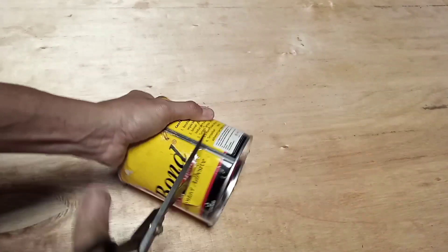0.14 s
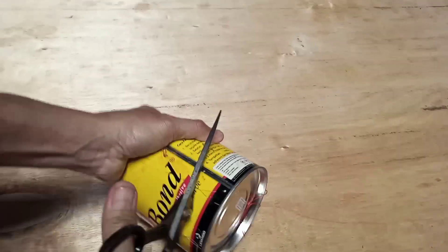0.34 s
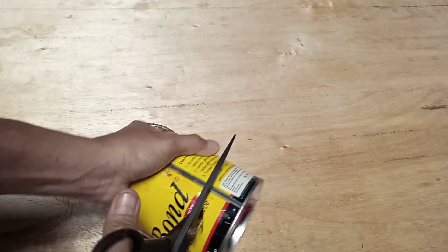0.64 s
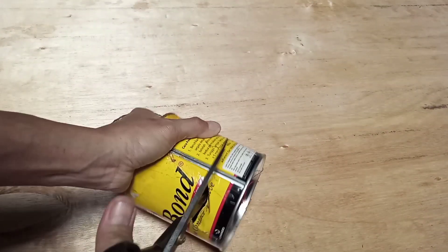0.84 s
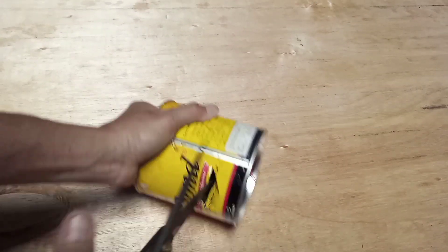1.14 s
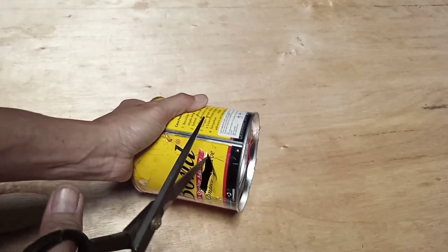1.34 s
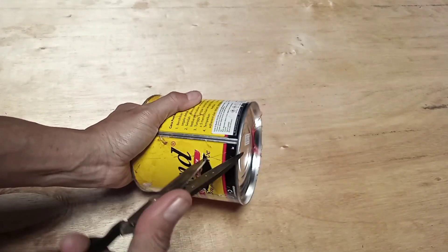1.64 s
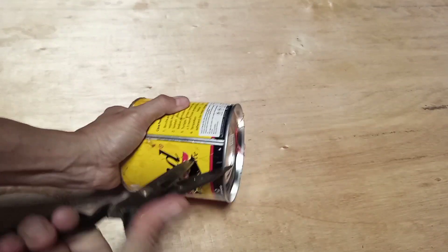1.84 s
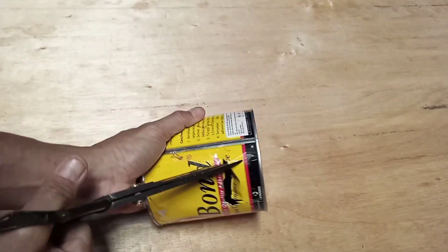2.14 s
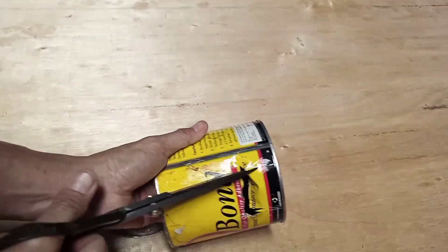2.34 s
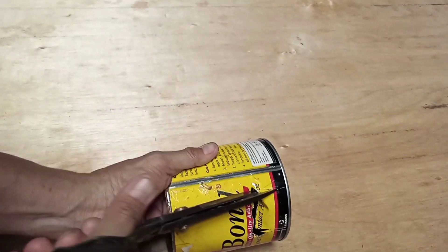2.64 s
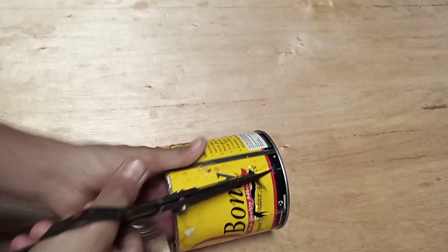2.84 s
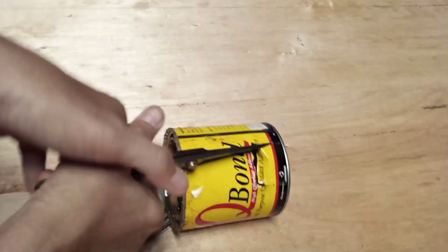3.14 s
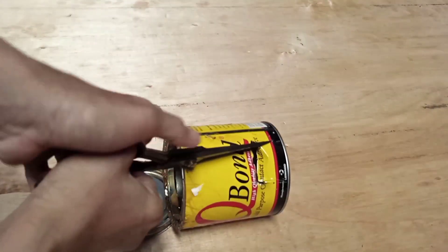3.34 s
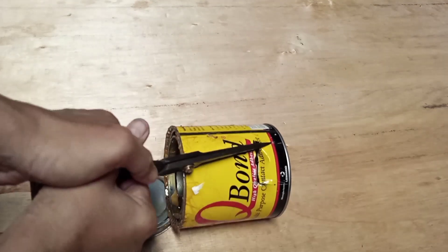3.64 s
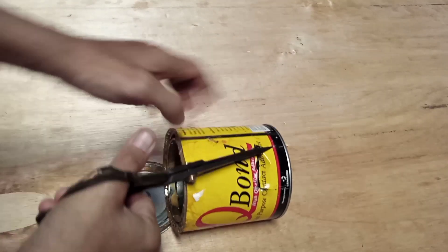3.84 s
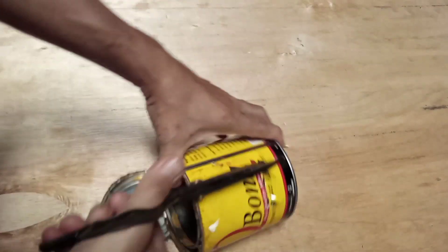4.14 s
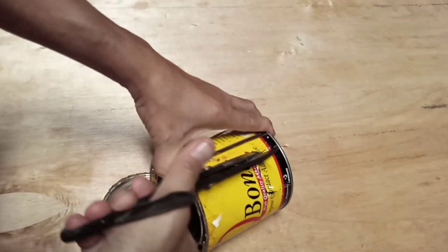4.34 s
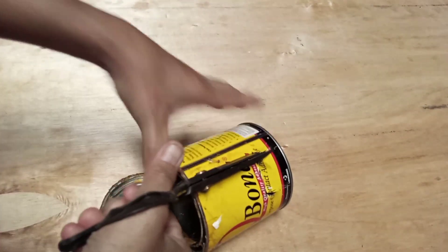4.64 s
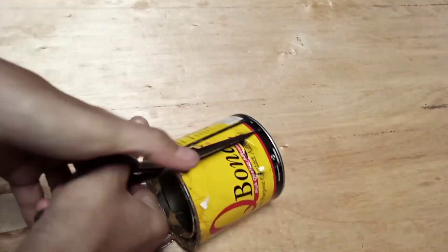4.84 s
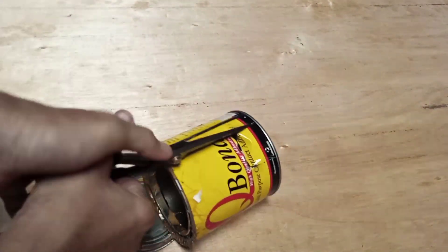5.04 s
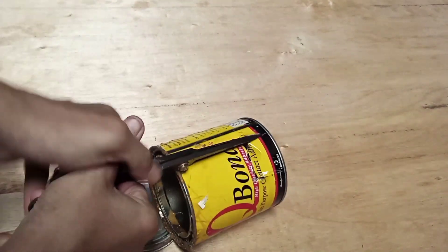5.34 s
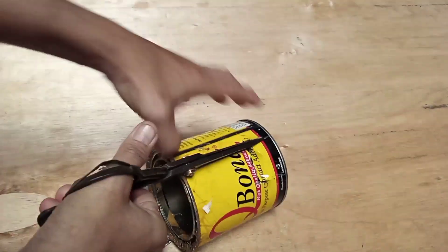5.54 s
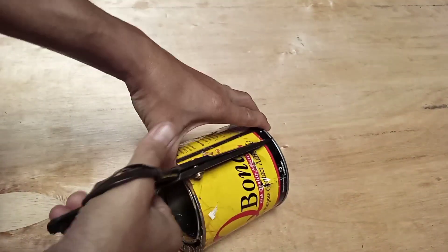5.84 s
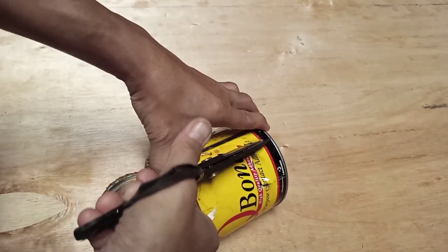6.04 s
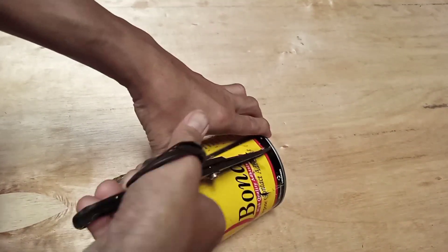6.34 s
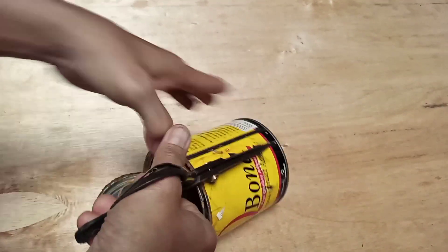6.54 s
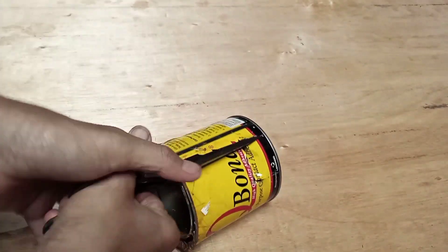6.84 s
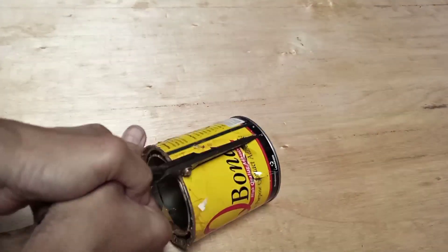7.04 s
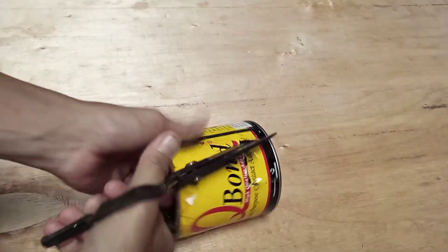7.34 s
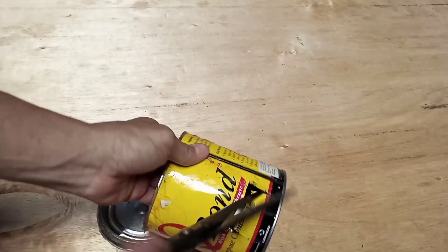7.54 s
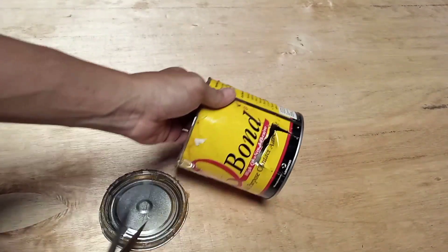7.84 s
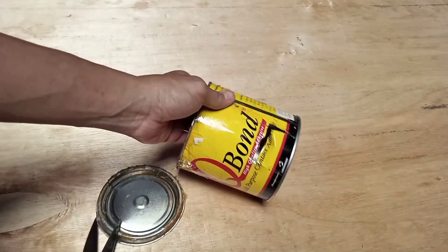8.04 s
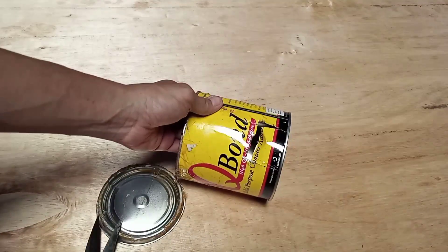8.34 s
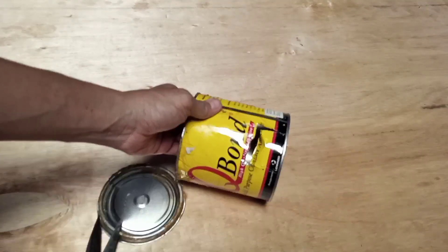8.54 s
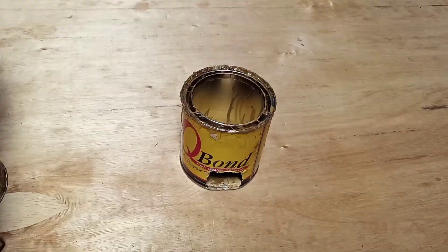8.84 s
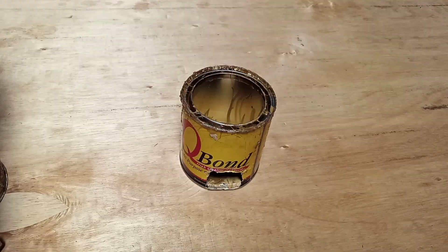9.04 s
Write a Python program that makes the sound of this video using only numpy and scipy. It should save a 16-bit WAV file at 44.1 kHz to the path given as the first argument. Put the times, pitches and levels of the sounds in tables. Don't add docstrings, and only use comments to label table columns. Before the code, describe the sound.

Hand shears work through an empty tin can held on a wooden table. A loud hollow clatter and snap come right at the start, then sparse ticks and scrapes, a dense burst of tearing near four seconds, more snaps and a final clack around eight. Close phone microphone, dull treble, very little room echo, almost silent background.

```python
import sys
import numpy as np
from scipy import signal
from scipy.io import wavfile
from scipy.ndimage import uniform_filter1d

SR = 44100
rng = np.random.default_rng(int(sys.argv[2]) if len(sys.argv) > 2 else 0)


def unload_wav(signal):
    wavfile.write(
        sys.argv[1],
        SR,
        np.round(np.clip(np.atleast_2d(signal).T, -1, 1) * 32767).astype(np.int16),
    )


def makeup_ratio(level_db):
    decades = np.asarray(level_db, float) / 20
    return 10 ** decades


N = 405717


def evened(x):
    return x / np.sqrt(np.mean(x ** 2) + 1e-20)


def curve(rows):
    return np.interp(np.arange(N) / SR, *np.transpose(rows))


def add(mix, s, sound):
    part = mix[max(round(s * SR), 0):][:len(sound)]
    part += sound[:len(part)]


def coloured(x, points):
    hz, db = np.transpose(points)
    half = np.interp(np.log(np.fft.rfftfreq(4096, 1 / SR) + 1), np.log(hz), db) * np.log(10) / 20
    full = np.concatenate([half, half[-2:0:-1]])
    taps = np.fft.ifft(np.exp(full - 1j * signal.hilbert(full).imag)).real[:2048]
    return signal.oaconvolve(x, taps)[:len(x)]


def ring(modes, damping=1., scatter_db=0., count=6000):
    hz, width, db = np.transpose(modes)[:, :, None]
    chance, t = rng.standard_normal((2, len(modes), 1)), np.arange(count) / SR
    decay = np.exp(-np.pi * abs(width) * damping * t)
    envelope = decay * (1 - np.exp(-t * hz / 1.7))
    heights = makeup_ratio(db + scatter_db * chance[0]) * np.sqrt(abs(width))
    detuned_hz = hz * (1 + 0.0089 * chance[1])
    return (heights * envelope * np.sin(2 * np.pi * detuned_hz * t)).sum(0)


def slips(per_s, spread_db, clump_db, clump_s, count=45):
    clumps = evened(uniform_filter1d(rng.standard_normal(N), round(clump_s * SR)))
    size = makeup_ratio(spread_db * np.minimum(rng.exponential(1, N), 4) + clump_db * clumps)
    ticks = size * rng.choice([-1, 1], N) * (rng.random(N) < per_s / SR)
    nearby_power = abs(uniform_filter1d(ticks ** 2, SR // count))
    return ticks / np.sqrt(nearby_power + 1e-9)


def stroke(s, peak_db, length, swells):
    fade_db, fade_curve, release_db_per_s, attack_s = 36, 1.686, 453, 0.0039
    length = max(length, .005)
    t = np.arange(0, length + .06, 1 / SR)
    progress = np.minimum(t / length, 1)
    lost_db = fade_db * (1 - progress if swells else progress) ** fade_curve
    lost_db = lost_db + release_db_per_s * np.maximum(t - length, 0)
    start = max(round((s - swells * length) * SR), 0)
    gain = np.minimum(t / attack_s, 1) * makeup_ratio(peak_db - lost_db)
    return start, gain[:N - start]


# (time [s], level [dB])
PRESSURE = [(0.0, -73.5), (1.3, -73), (1.9, -71), (3.1, -70), (3.5, -76.5), (4.44, -71.5), (4.83, -64),
            (5.7, -67.5), (6.2, -71), (7.8, -75.5), (8.65, -88), (8.8, -131)]
# (middle [s], half length [s])
RESTS = [(0.604, .022), (0.929, 0.013), (1.004, .014), (1.328, 0.058), (1.402, .013), (1.46, .025),
         (1.548, .018), (2.282, 0.02), (2.429, 0.045), (2.625, .018), (2.717, .018), (3.152, .015),
         (3.279, .018), (3.327, .015), (3.506, .05), (3.656, .015), (4.091, .03), (4.164, .035),
         (4.246, .011), (4.443, 0.01), (4.577, .021), (4.76, 0.013), (5.158, 0.0099), (5.365, .015),
         (5.749, 0.037), (5.801, 0.017), (6.058, 0.013), (6.186, 0.027), (6.418, 0.032), (6.541, .014),
         (6.665, .015), (6.789, .008), (6.85, .009), (6.907, 0.011), (7.144, 0.012), (7.272, 0.015),
         (7.376, 0.011), (7.585, 0.029), (7.683, .012), (7.87, .03), (8.003, .07), (8.237, 0.064)]


def pressure():
    rest_db, rest_edge = -14, 0.97
    t = np.arange(0, N / SR, .002)
    middle, half = np.transpose(RESTS)[:, :, None]
    dips = np.minimum(np.exp(-abs((t - middle) / half) ** rest_edge).sum(0), 1)
    return makeup_ratio(curve(PRESSURE) + rest_db * curve(np.transpose([t, dips])))


# (frequency [Hz], width [Hz], level [dB])
LOW_MODES = [(515, 17, -7), (575.5, 25, -7.5), (605.3, 32, 0.5), (657, 40, 1), (773.7, 21, -3),
             (806, 48, 0.5), (955, 25, -6)]
# (frequency [Hz], width [Hz], level [dB])
UPPER_MODES = [(1150, 100, -8.5), (1275, 53, -2), (1400, 90, 5.5), (1578, 76, 2.5), (1674, 45, -1),
               (1843, 52, -2), (1911, 45, -0.5), (2059, 55, 2), (2250, 87, 2), (2500, 40, -5.5),
               (2740, 98, 0), (2950, 53, -6), (3190, 120, -11), (3590, 150, -15)]


def can(panel_hz):
    high = panel_hz > UPPER_MODES[0][0] * .9
    low_modes = LOW_MODES + [(panel_hz, 30, -30 if high else 10)]
    return low_modes, UPPER_MODES + [(panel_hz, 150, 3 if high else -30)]


# (frequency [Hz], width [Hz], level [dB])
AIR_MODES = [(254, 5.1, -19), (315.6, 51, -0.5)]
# (time [s], peak [dB], length [s], panel bitten [Hz])
BITES = [(0.106, -40, 0.12, 528), (0.206, -22.5, 0.056, 726), (0.221, -10.5, 0.11, 758),
         (0.269, -22, 0.045, 578), (0.68, -33.5, 0.18, 740), (0.941, -42, 0.059, 567),
         (1.087, -29.5, 0.13, 740), (1.805, -37, 0.059, 579), (2.513, -30, 0.025, 560),
         (3.551, -26, 0.069, 761), (3.982, -46.5, 0.16, 770), (5.204, -41.5, 0.11, 642),
         (5.21, -44.5, 0.14, 822), (5.753, -59, 0.32, 656), (6.479, -36, 0.077, 667),
         (7.56, -54, 0.073, 782)]
# (time [s], peak [dB], length [s], panel [Hz])
RUBS = [(0.0, -48, 0.061, 550), (0.458, -46, 0.19, 580), (0.695, -41.5, 0.15, 615),
        (0.816, -33.5, .08, 801), (0.972, -52.5, 0.18, 565), (1.134, -36.5, 0.071, 790),
        (1.227, -41, 0.12, 576), (2.559, -44, 0.087, 552), (2.784, -44, 0.14, 1990),
        (3.094, -60, 0.26, 530), (3.559, -45, 0.11, 698), (3.744, -52.5, 0.046, 445),
        (4.255, -44, 0.079, 687), (4.337, -45, 0.088, 647), (4.431, -46.5, 0.092, 669),
        (4.598, -48, 0.078, 2620), (5.667, -41.5, 0.022, 616.5), (6.091, -43.5, 0.041, 513.5),
        (6.232, -45, .06, 566), (6.263, -38.5, 0.126, 1340), (7.167, -48.5, 0.12, 624),
        (8.171, -47.5, .17, 567)]
# (time [s], peak [dB], length [s], panel [Hz])
SLIDES = [(0.041, -46, 0.046, 2320), (0.241, -26, 0.11, 1300), (0.34, -32, 0.13, 1840),
          (0.398, -39, 0.022, 1410), (0.708, -27, 0.04, 2325), (0.731, -55, .03, 3770),
          (1.84, -40, 0.04, 1856), (2.132, -66, 0.32, 2230), (2.19, -52, 0.11, 1870),
          (2.277, -62.5, 0.15, 1800), (2.389, -64, 0.15, 1500), (2.491, -51.5, 0.042, 2160),
          (3.855, -59.5, 0.36, 2710), (4.113, -55, 0.23, 1420), (4.989, -60, 0.27, 1360),
          (5.382, -60.5, 0.1, 1900), (5.492, -57, 0.14, 2530), (5.946, -46, 0.022, 1410),
          (6.447, -41.5, 0.088, 1365), (6.973, -62.5, .2, 1650), (7.483, -59.5, 0.21, 2264),
          (7.626, -62.5, 0.26, 1520), (7.946, -52.5, .12, 1416), (8.094, -39, 0.032, 2094),
          (8.099, -31, 0.069, 1386), (8.337, -61.5, 0.076, 2550)]
# (end [s], peak [dB], length [s], panel [Hz])
DRAGS = [(1.522, -52.5, 0.055, 680), (1.987, -53, 0.04, 2360), (2.133, -49, 0.49, 564),
         (3.085, -53, 0.39, 1164), (4.151, -48, 0.071, 672), (5.205, -48, 0.046, 2270),
         (5.944, -64.5, 0.23, 660), (6.095, -62.5, 0.14, 1350), (7.354, -57, 0.14, 2188),
         (7.487, -50, 0.24, 626), (9.2, -59.5, 0.25, 537)]


def scrape():
    # table, air against low tones [dB], upper against low tones [dB], whether it swells
    kinds = [(BITES, -25.5, -10, False), (RUBS, 0.17, -7.5, False),
             (SLIDES, -2.5, 4.9, False), (DRAGS, -2.6, -1.8, True)]
    drives = [slips(1800, 1.8, clump_db, 0.0087) for clump_db in (6.5, 4.5, 6.)]
    parts = [(0, pressure() * makeup_ratio(-2.5), 2550, 1.8, 7.6)]
    for rows, air_db, upper_db, swells in kinds:
        for s, db, length, panel_hz in rows:
            parts.append((*stroke(s, db, length, swells), panel_hz, air_db, upper_db))
    out = np.zeros(N)
    for start, gain, panel_hz, air_db, upper_db in parts:
        bodies = (*can(panel_hz), AIR_MODES)
        for modes, drive, offset_db in zip(bodies, drives, (0, upper_db, air_db)):
            body = ring(modes, scatter_db=3, count=3000)
            push = makeup_ratio(offset_db) * gain * drive[start:start + len(gain)]
            add(out, start / SR, signal.fftconvolve(push, body / np.linalg.norm(body)))
    return makeup_ratio(-2.5) * out


# (time [s], level [dB])
RUMBLE = [
    (0.0, -73),
    (0.28, -56),
    (0.46, -70.5),
    (3.89, -62.5),
    (7.38, -74),
    (7.46, -53),
    (7.81, -75.5),
    (8.07, -52),
    (8.87, -91.5),
    (9.2, -60.5),
]
# (time [s], peak [dB], frequency [Hz])
BUMPS = [
    (1.703, -48.5, 131),
    (3.751, -24, 232.7),
    (3.85, -33, 313),
    (4.599, -32, 123.4),
    (5.512, -32.5, 111.8),
    (5.667, -29.5, 141),
    (6.093, -31, 277),
    (7.474, -30, 250),
    (8.272, -33.5, 85.5),
]


def table():
    jolt_db, jolt_share = -39, 0.69
    band = signal.butter(3, [45, 220], "band", fs=SR, output="sos")
    low = signal.sosfilt(band, slips(830, 3.0, 1.5, 0.018))
    shake = makeup_ratio(curve(RUMBLE) - 2.0)
    for rows, swells in ((RUBS, False), (DRAGS, True)):
        for s, db, length, _ in rows:
            start, gain = stroke(s, db, length, swells)
            add(shake, start / SR, makeup_ratio(jolt_db) * gain ** jolt_share)
    out, t = evened(low) * shake, np.arange(3000) / SR
    for s, db, hz in BUMPS:
        add(out, s, makeup_ratio(db + 1.5) * np.sin(2 * np.pi * hz * t) * np.exp(-t / 0.0014))
    return signal.sosfilt(signal.butter(2, 55, "high", fs=SR, output="sos"), out)


# (frequency [Hz], level per Hz [dB])
ROOM_COLOUR = [(18, -39.5), (30, -3.5), (641, -3.5), (704, -6.5), (1390, -13.5), (6480, -24.5), (8000, -36),
               (10400, -36.5), (17600, -120)]


def room():
    room_db, patchy_db = -67.5, 2.2
    bins_hz, (hz, db) = np.fft.rfftfreq(512, 1 / SR), np.transpose(ROOM_COLOUR)
    a, b, patches = rng.standard_normal((N // 128 + 5, 257, 3)).T
    patches = evened(uniform_filter1d(uniform_filter1d(patches, 4, 0), 6, 1))
    colour_db = np.interp(np.log(bins_hz + 1), np.log(hz), db)[:, None]
    z = (a + 1j * b) * makeup_ratio(colour_db + patchy_db * patches)
    return makeup_ratio(room_db) * evened(signal.istft(z, nperseg=512, noverlap=384)[1][:N])


def grain(db, count=500):
    t = np.arange(count) / SR
    hz = np.clip(3900 * makeup_ratio(-.12 * (db + 29.5) + 3.7 * rng.standard_normal()), 1500, 7000)
    rattle = rng.standard_normal(count) * np.exp(-t / 0.00068) * makeup_ratio(-11)
    rattle[0] += 1.5
    r = np.exp(-np.pi * 1.15 * hz / SR)
    click = signal.lfilter([1, 0, -1], [1, -2 * r * np.cos(2 * np.pi * hz / SR), r * r], rattle)
    return makeup_ratio(db) * click / abs(click).max()


# (time [s], peak [dB], length [s])
RIPS = [(.267, -30, 0.06), (.339, -40.5, 0.06), (.386, -49, .09), (.71, -29, .1), (.826, -48, 0.075),
        (.934, -39, .07), (1.09, -38, .05), (1.104, -27, 0.11), (1.177, -55, 0.085), (1.756, -50.5, 0.19),
        (1.924, -43, 0.19), (2.103, -30.5, 0.053), (2.495, -47, 0.22), (2.83, -50.5, 0.52),
        (3.348, -67.5, 0.1), (3.553, -33.5, 0.09), (3.779, -45, 0.14), (3.847, -27, 0.045),
        (4.478, -45.5, .11), (5.188, -38, 0.04), (5.248, -49, 0.12), (5.515, -47.5, 0.043),
        (5.555, -46, 0.024), (5.595, -60.5, 0.09), (4.68, -49, .09), (5.456, -52.5, .07),
        (5.84, -50.5, .06), (6.56, -57.5, .12), (6.815, -58.5, .05), (1.57, -59, .15), (5.923, -50, 0.13),
        (6.106, -55, 0.022), (6.274, -58, 0.091), (6.477, -43.5, .065), (6.984, -46, 0.045),
        (7.224, -50, .06), (7.487, -32.5, 0.08), (8.094, -38, .09)]
# (end [s], peak [dB], length [s])
STRAINS = [(.072, -47, 0.16), (.267, -22, 0.058), (.571, -52.5, 0.052), (.71, -43.5, 0.1),
           (1.62, -63, 0.077), (1.756, -56, 0.17), (2.81, -48, 0.084), (3.736, -54.5, 0.11),
           (3.779, -41, 0.02), (3.847, -38, 0.046), (3.963, -56, 0.23), (4.382, -52.5, 0.21),
           (4.645, -48, 0.074), (4.717, -56.5, 0.15), (5.416, -59, 0.035), (5.515, -51.5, 0.072),
           (5.871, -49, 0.027), (6.106, -49.5, 0.034), (6.45, -51.5, 0.021), (6.71, -59, .02),
           (7.487, -39, 0.11), (7.834, -68, 0.48), (9.2, -65.5, 0.12)]
# (frequency [Hz], level [dB])
TEAR_COLOUR = [(400, -35.5), (1000, -8.5), (2000, -2), (3000, 4.5), (5000, 1), (7000, -0.5)]
# (time [s], peak [dB])
SNAPS = [(0.0101, -21.5), (0.3824, -11.5), (0.67, -24), (0.9389, -15), (1.7623, -31.5), (2.009, -22),
         (2.1825, -23.5), (2.334, -18.5), (2.5562, -25), (2.9687, -18.5), (3.0204, -23.5), (3.5548, -14),
         (4.5069, -21.5), (4.636, -20.5), (4.713, -22), (4.986, -26.5), (5.03, -26.5), (5.5082, -18.5),
         (5.5164, -16.5), (5.557, -25.5), (5.56, -25), (5.602, -17), (5.605, -23), (5.652, -26),
         (5.653, -28.5), (5.6556, -31), (5.6694, -9), (6.7619, -20), (7.229, -22.5), (7.739, -23),
         (7.7928, -33.5), (7.8267, -22.5), (8.0927, -14),
         (3.6912, -26), (3.73, -26.5), (3.781, -21.5), (3.8044, -19), (3.84, -15), (3.8483, -9.5),
          (3.8519, -10), (3.8758, -16), (3.882, -21), (3.895, -14.5), (3.904, -23), (3.925, -18),
          (3.9616, -24), (3.9782, -24), (4.8123, -28), (4.9026, -33.5), (2.491, -26), (5.9275, -24.5),
          (7.4364, -24), (7.4629, -17.5), (7.487, -12), (7.4993, -22.5), (7.5273, -17.5), (7.6961, -26)]
# (time [s], peak [dB])
TICKS = [(0.5681, -35), (0.637, -39.5), (0.649, -28.5), (0.6575, -32), (.7545, -24), (.793, -33),
         (.8328, -36), (0.8603, -30.5), (0.8889, -32), (.987, -35.5), (1.0643, -38), (1.162, -24),
         (1.184, -42), (1.1936, -47), (1.2128, -29.5), (1.5868, -32), (1.5943, -40), (1.6227, -31.5),
         (1.7402, -31), (1.757, -26.5), (1.766, -28.5), (1.7767, -26), (1.8986, -26), (1.9087, -39),
         (1.9202, -33), (1.9285, -25), (1.9346, -32), (1.983, -30), (2.0049, -27.5), (2.0532, -31),
         (2.2228, -33.5), (2.547, -27.5), (2.5606, -31), (2.587, -33.5), (2.8058, -26.5),
         (2.8577, -28), (2.8676, -37), (2.9031, -29), (2.931, -50), (2.962, -38), (3.0864, -27.5),
         (3.1115, -37), (3.1948, -35), (3.3878, -37.5), (3.3972, -39.5), (3.408, -37), (3.7736, -40),
         (3.7891, -19.5), (3.8328, -32), (3.8896, -27), (3.911, -43), (3.9406, -18.5), (3.9822, -28),
         (4.001, -34), (4.012, -31), (4.0287, -32.5), (4.3216, -30), (4.3469, -30), (4.365, -37),
         (4.6226, -28.5), (4.68, -36.5), (4.728, -37), (4.7775, -33.5), (4.8506, -32.5), (4.878, -35),
              (4.8867, -28.5), (4.9193, -27.5), (4.958, -41), (5.037, -36), (5.1121, -30), (5.1938, -29),
              (5.2485, -41), (5.2637, -28), (5.292, -35), (5.318, -46), (5.404, -29.5), (5.4569, -33.5),
              (5.5338, -36), (5.5819, -35), (5.6351, -40), (5.6905, -26.5), (5.7138, -35), (5.8713, -32),
              (5.993, -47), (6.0457, -41.5), (6.087, -26), (6.1045, -34), (6.1119, -30), (6.126, -33),
              (6.3622, -37), (6.4804, -25), (6.594, -42), (6.6027, -34.5), (6.7433, -39), (6.9445, -34),
              (6.9906, -40), (7.0012, -29.5), (7.016, -37), (7.109, -42), (7.2889, -31.5), (7.5103, -18.5),
              (7.5515, -35), (7.6863, -29), (7.7142, -38.5), (7.7312, -32), (7.7484, -26.5), (7.7892, -26),
              (9.199, -46)]


def crackle():
    rasp_db, rasp_share = -41, 0.86
    level = pressure() * makeup_ratio(11)
    for rows, swells in ((RIPS, False), (STRAINS, True)):
        for row in rows:
            start, gain = stroke(*row, swells)
            add(level, start / SR, gain)
    dense = np.clip(rasp_share * level / (level + makeup_ratio(rasp_db)), 0, 1)
    tears = evened(slips(1600, 2.6, 5.3, 0.012, count=22))
    drive = (1 - dense) * tears + dense * rng.standard_normal(N)
    fine = evened(coloured(drive, TEAR_COLOUR)) * level
    large = np.zeros(N)
    for s, db in SNAPS + TICKS:
        add(large, s, makeup_ratio(-0.5) * grain(db))
    return fine + coloured(large, [(300, -4.0), (1500, -3.5), (2500, 2.0)])


# (time [s], peak [dB], upper against low tones [dB],
# time to fall 60 dB [s], upper panel struck [Hz])
KNOCKS = [(0.219, -11.5, -8, 0.2, 1294), (0.244, -7.5, -5.5, 0.04, 2100), (0.25, -9, -1.5, 0.045, 2950),
          (0.276, -13.5, -7.5, 0.052, 1290), (0.69, -20, -27, 0.05, 1460), (.762, -29.5, 2.5, .03, 1570),
          (0.819, -26, -10, 0.044, 1300), (0.938, -18, -3, 0.039, 2400), (1.09, -24.5, -6, 0.024, 1800),
          (1.498, -36, -12, 0.065, 1740), (1.513, -33, -12.5, 0.047, 2240), (2.076, -32.5, 2, 0.05, 2270),
          (2.113, -29.5, 0.5, 0.032, 3440), (3.5556, -12.5, -6, 0.04, 2680),
          (4.263, -35, -0.5, 0.041, 1800), (4.444, -29, -9.5, 0.028, 1150), (5.207, -17, -4, 0.021, 2080),
          (6.445, -44.5, 5, 0.03, 1390), (6.666, -51, -30, 0.11, 1660), (7.91, -39.5, 9, 0.13, 1360),
          (8.0842, -14, 5.5, 0.029, 1483), (8.0959, -12.5, 3.5, 0.015, 1030),
          (8.365, -65.5, 16, 0.033, 3750), (8.449, -62, 12, 0.027, 2440), (8.672, -68.5, 21.5, 0.028, 1400)]


def knocks():
    out, strokes = np.zeros(N), np.array(BITES + RUBS)
    for s, db, upper_db, t60, bright_hz in KNOCKS:
        blow = 0.099 * rng.standard_normal(300) * np.exp(-np.arange(300) / (0.0036 * SR))
        blow[:9] += np.hanning(9)
        damping = .07 / max(t60, .02)
        panel_hz = strokes[abs(strokes[:, 0] - s).argmin(), 3]
        bodies = can(panel_hz)[0], UPPER_MODES + [(bright_hz, 70, 11)]
        low, upper = (signal.oaconvolve(ring(modes, damping, scatter_db=2, count=4000), blow)
                      for modes in bodies)
        add(out, s, makeup_ratio(db) * (low / abs(low).max() + makeup_ratio(upper_db) * upper / abs(upper).max()))
    return out


# (time [s], peak [dB], time to fall 60 dB [s])
BOOMS = [
    (0.466, -41, .2),
    (0.818, -37, 0.12),
    (3.557, -33.5, .15),
    (4.264, -38.5, 0.17),
    (2.595, -45, 0.17),
    (4.289, -40, .08),
    (4.445, -44, 0.24),
    (6.239, -42.5, 0.15),
    (7.181, -45.5, 0.33),
]


def booms():
    boom_hz, rise_s = 325, 0.0052
    out, t = np.zeros(N), np.arange(9000) / SR
    tone = np.minimum(t / rise_s, 1) * np.sin(2 * np.pi * boom_hz * t)
    for s, db, t60 in BOOMS:
        add(out, s, makeup_ratio(db - 60 * t / t60) * tone)
    return out


# (frequency [Hz], width [Hz], level [dB])
STEEL_MODES = [(1534, 40, -1), (2040, 20, -8.5), (2920, 60, 0), (3160, 54, -3.5), (4270, 45, -9),
               (5150, 60, -13.5), (5780, 60, -9), (6940, 90, -13.5)]
# (time [s], peak [dB], rattle [s])
CLANKS = [
    (0.71, -23.5, 0.018),
    (2.105, -38, 0.0036),
    (2.115, -38, 0.0046),
    (4.127, -52.5, .04),
    (6.445, -33, 0.003),
    (6.466, -60, 0.0033),
    (6.482, -42, 0.0018),
    (6.499, -51, 0.0038),
    (7.91, -43.5, 0.0066),
    (8.096, -27.5, .006),
]


def clanks():
    out, t = np.zeros(N), np.arange(2600) / SR
    for s, db, rattle in CLANKS:
        ticks = rng.standard_normal(2600) + 4.3 * (t == 0)
        ticks = ticks * np.exp(-t / max(rattle, .001))
        tone = signal.oaconvolve(ring(STEEL_MODES, scatter_db=-3, count=3000), ticks)
        add(out, s, makeup_ratio(db) * tone / abs(tone).max())
    return out


# (time [s], length [s], level [dB], start pitch [Hz], end pitch [Hz])
SQUEAKS = [(1.09, 0.051, -30, 4260, 3960), (1.101, 0.036, -24, 2040, 2096),
           (1.139, 0.016, -29.5, 2200, 2230), (1.166, 0.015, -43, 2130, 2150),
           (1.106, .048, -35.5, 5600, 5630), (2.085, 0.13, -54.5, 2250, 2134),
           (2.27, 0.091, -59, 1748, 1947), (2.39, 0.084, -69.5, 1450, 1380),
           (2.4, 0.067, -64.5, 1951, 1925), (8.01, .072, -61.5, 1400, 1368),
           (8.006, .065, -65.5, 2164, 2144)]


def squeaks():
    out = np.zeros(N)
    for s, length, db, from_hz, to_hz in SQUEAKS:
        wander = uniform_filter1d(rng.standard_normal((2, 9000)), size=300, axis=1)
        a, b = wander[:, :round(length * SR)]
        turn = 2 * np.pi * np.cumsum(np.linspace(from_hz, to_hz, len(a))) / SR
        tone = evened(a * np.cos(turn) + b * np.sin(turn))
        add(out, s, makeup_ratio(db) * np.hanning(len(a)) ** .5 * tone)
    return out


def scene():
    near = scrape() + crackle() + knocks() + booms() + clanks() + squeaks()
    near = signal.sosfilt(signal.butter(4, 260, "high", fs=SR, output="sos"), near)
    t = np.arange(5000) / SR
    echo = rng.standard_normal(5000) * makeup_ratio(-60 * t / 0.081) * (t > .003)
    wet = signal.oaconvolve(near, echo / np.linalg.norm(echo))[:N]
    return (near + makeup_ratio(-19.5) * wet + table() + room())[None]


def denoised(x):
    z = signal.stft(x, nperseg=512, noverlap=384)[2]
    power = uniform_filter1d(uniform_filter1d(abs(z) ** 2, size=5, axis=0), size=5, axis=1) + 1e-16
    floor = np.percentile(power[:, ::4], 15, axis=1)[:, None]
    gain = np.maximum(1 - makeup_ratio(4.0) * floor / power, makeup_ratio(-7.0))
    return signal.istft(z * gain, nperseg=512, noverlap=384)[1][:N]


def band_limit(x):
    return signal.sosfilt(signal.butter(12, 15450, fs=SR, output="sos"), x)


# (frequency [Hz], level [dB])
PHONE_COLOUR = [(6200, 0), (7000, -4.5), (7600, -16), (8100, -27.5), (8500, -46), (9000, -95)]


def record(dry):
    gap_start_s, gap_end_s, gap_fade_s = 8.834, 8.94, .004
    t = np.arange(N) / SR
    gap = np.clip(np.maximum(gap_start_s - t, t - gap_end_s) / gap_fade_s, 0, 1)
    x = coloured(denoised(np.tanh(dry[0])), PHONE_COLOUR)
    x = x + makeup_ratio(-84) * rng.standard_normal(N) * .5
    return band_limit((x * gap)[None])


dry = scene()
out = record(dry)
unload_wav(out)
```